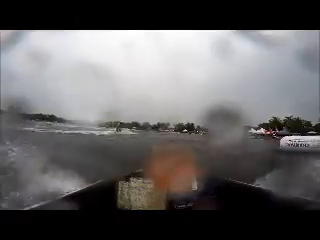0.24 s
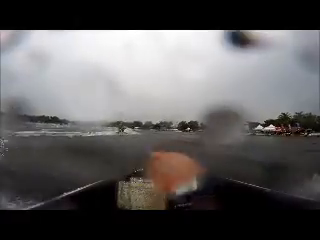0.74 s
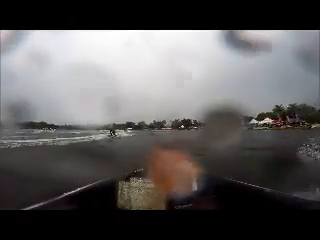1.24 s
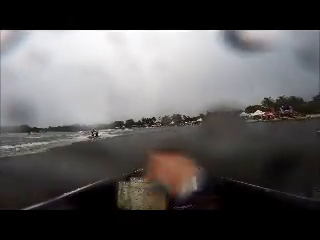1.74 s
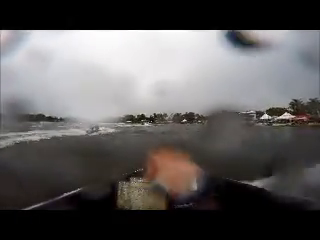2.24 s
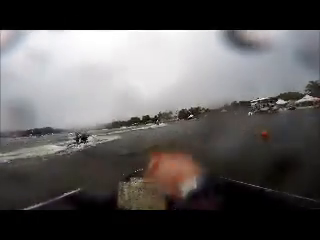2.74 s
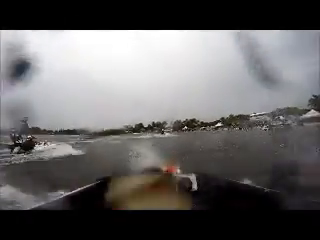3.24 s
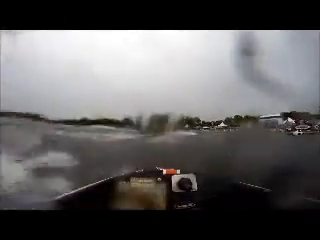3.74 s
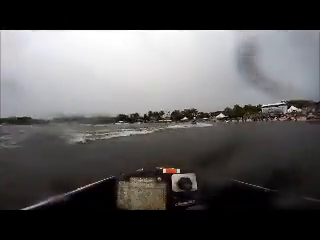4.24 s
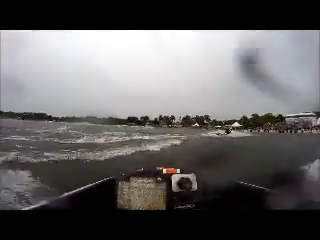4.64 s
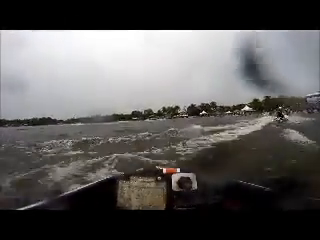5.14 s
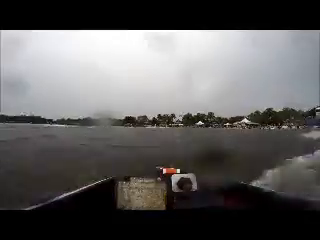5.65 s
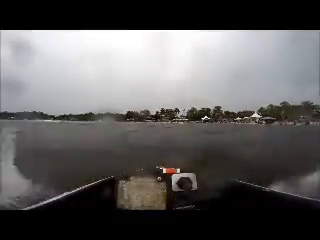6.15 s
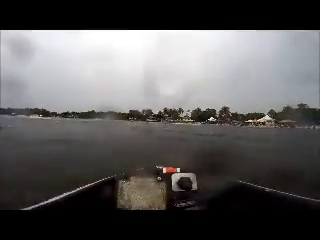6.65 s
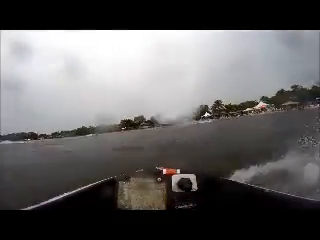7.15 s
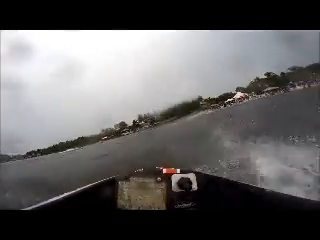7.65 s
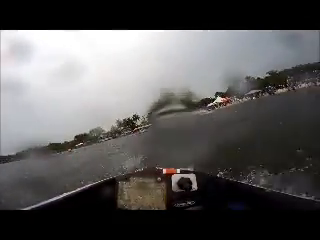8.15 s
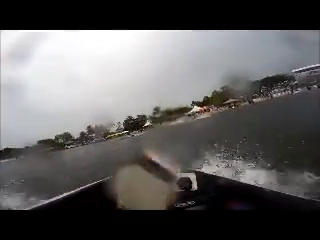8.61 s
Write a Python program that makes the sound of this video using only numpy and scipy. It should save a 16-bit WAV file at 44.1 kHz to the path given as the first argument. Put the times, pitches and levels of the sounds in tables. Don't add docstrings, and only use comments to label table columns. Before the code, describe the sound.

Muffled onboard watercraft ride: engine flaring and sagging as it leaps chop, loose plastic knocking, hard hull slaps, rushing water and ticking drops.

```python
import sys
import numpy as np
from scipy import signal
from scipy.fft import rfft, irfft, next_fast_len
from scipy.io import wavfile
from scipy.ndimage import uniform_filter1d

SR = 44100
rng = np.random.default_rng(int(sys.argv[2]) if len(sys.argv) > 2 else 0)


def wrap_up_sound(samples):
    columns = np.atleast_2d(samples).T
    tamed = np.clip(columns, -1, 1)
    steps = np.round(tamed * 32767).astype(np.int16)
    wavfile.write(sys.argv[1], SR, steps)


def nominal_scale(level):
    x = np.asarray(level, float) / 20
    return 10 ** x


N = 391608


def evened(x):
    return x / np.sqrt(np.mean(x ** 2) + 1e-20)


def steadied(x, span_s):
    size = int(span_s * SR)
    power = uniform_filter1d(uniform_filter1d(x ** 2, size), size)
    return x / np.sqrt(abs(power) + 1e-9)


def along(rows, column, t):
    rows = np.array(rows)
    return np.interp(t, rows[:, 0], rows[:, column])


def coloured(x, points):
    size = next_fast_len(N)
    f, db = np.transpose(points)
    bins = np.fft.rfftfreq(size, 1 / SR)
    gain = nominal_scale(np.interp(np.log(bins + 1), np.log(f), db))
    return irfft(rfft(x, size) * gain, size)[:N]


def band(x, low_hz, high_hz, order=2):
    return signal.sosfilt(signal.butter(order, [low_hz, high_hz], "band", fs=SR, output="sos"), x)


def ring(x, modes):
    out = 0
    for k, (hz, width, db) in enumerate(modes):
        out = out + (-1) ** k * nominal_scale(db) * signal.lfilter(*signal.iirpeak(hz, hz / width, SR), x)
    return out


def wander(span_s):
    size = int(span_s * SR)
    return evened(uniform_filter1d(uniform_filter1d(rng.standard_normal(N), size), size))


def add(mix, s, sound):
    part = mix[round(s * SR):][:len(sound)]
    part += sound[:len(part)]


def racing(t):
    # t/s, speed/turns per s
    cruise = [(0, 53), (.6, 50.5), (1.0, 55), (1.3, 46), (1.82, 66), (2.05, 68), (2.45, 70), (2.8, 60),
              (3.1, 52), (3.4, 41), (3.66, 58), (4.2, 58), (5.17, 56), (5.5, 69), (5.8, 55), (6.08, 65),
              (6.4, 47), (8.88, 45)]
    # start/s, grips again/s, top speed/turns per s, settling time/s
    revs = [(1.0, 1.15, 84, .12), (1.33, 1.61, 103, .21), (1.82, 1.95, 90, .06), (2.04, 2.17, 94, .05),
            (2.23, 2.38, 102, .07), (2.47, 2.58, 87, .2), (2.82, 2.99, 95, .11), (3.94, 4.1, 85, .08),
            (4.2, 4.33, 82, .2), (4.62, 4.97, 138, .13), (5.17, 5.39, 108, .07), (5.54, 5.66, 89, .15),
            (5.81, 5.9, 73, .16), (6.07, 6.17, 90, .13), (6.8, 6.93, 61, .3)]
    limiter_hz, rise_bend, fall_bend, swell_s = 108, .85, 1.5, 0.042
    base, gain, free = along(cruise, 1, t), 0 * t, 0 * t
    for start, grip, top, settle in revs:
        climb = np.clip((t - start) / (grip - start), 0, 1) ** rise_bend
        sag = np.clip((t - grip) / settle, 0, 1) ** fall_bend
        gain = np.maximum(gain, (climb - sag) * (top - base))
        loose = np.interp(t, [start, start + swell_s, grip, grip + settle], [0, 1, 1, 0])
        free = np.maximum(free, loose)
    return np.minimum(base + gain, limiter_hz), free


def bursts(t, exhaust_share):
    # opens/s, full/s, shuts/s, shaking level/dB, exhaust over shaking/dB
    throttle_bursts = [(0.921, 1.019, 1.107, -19, 4.5), (1.362, 1.511, 1.66, -13.5, -1),
                       (1.808, 1.894, 1.98, -25, -6.5), (1.993, 2.132, 2.16, -16.5, -3),
                       (2.215, 2.313, 2.407, -15, -5), (2.477, 2.538, 2.438, -11, -2),
                       (2.776, 2.913, 2.96, -15, -5.5), (3.878, 3.994, 3.99, -20.5, 3.5),
                       (4.19, 4.231, 4.28, -18, 2), (4.588, 4.781, 4.972, -14, 2.5),
                       (5.154, 5.262, 5.37, -19, -1), (5.54, 5.63, 5.62, -18, -3.5),
                       (5.803, 5.85, 5.79, -22, -7.5), (6.057, 6.186, 6.105, -11.5, -9)]
    open_db, release_db_per_s, lift_off_s = -16, 198, 0.013
    shake_db, opened = 0 * t - 90, 0 * t
    for start, full, shut, db, over_db in throttle_bursts:
        level = np.interp(t, [start - .03, start, full, shut, shut + 0.26],
                          [-60, open_db, 0, 0, -.3 * release_db_per_s])
        shake_db = np.maximum(shake_db, db + exhaust_share * over_db + level)
        grip = np.interp(t, [start, start + 0.026, shut, shut + lift_off_s], [0, 1, 1, 0])
        opened = np.maximum(opened, grip)
    return shake_db, opened


def ride():
    # t/s, effort level/dB, buffeting by the chop/dB
    load = [(0, -26.5, -12), (.57, -24, -8), (.9, -30, -11.5), (1.25, -37.5, -21.5), (1.8, -27, -17.5),
            (2.7, -36.5, -18.5), (3.4, -29, -10.5), (3.6, -42.5, -12), (3.9, -27, -13.5),
            (4.55, -33.5, -14), (5.1, -42.5, -17.5), (5.75, -33.5, -21), (6.05, -33, -19.5),
            (6.35, -44, -17.5), (6.75, -37, -8), (7.5, -36, -10), (8.0, -34, -12), (8.88, -32, -7)]
    # t/s, sink of the level/dB, recovery time/s, boom surge/dB
    slams = [(1.35, -7.5, 0.053, 12.5), (2.998, -10, 0.15, 7.5), (3.147, -23, 0.23, 4.5),
             (3.471, 2.5, 0.069, -9), (3.821, -5, 0.15, -2.5), (4.438, -7, 0.077, 4), (5.36, -8, 0.12, 7),
             (6.207, -14.5, 0.14, 10.5), (6.408, -11.5, 0.061, 5.5), (6.488, -0.5, 0.023, 1),
             (6.589, -11, 0.12, 3.5), (7.292, -19, 0.13, 7.5), (7.489, -2.5, .1, 3),
             (7.698, -17.5, 0.23, 7), (8.842, -12.5, .1, -4)]
    sink_s, surge_s, crash_s, exhaust_lead_s = 0.023, .03, 0.016, 0.023
    t = np.linspace(0, N / SR, num=6000)
    speed, free = racing(t)
    shake_db, opened = bursts(t, 0)
    gas_db, _ = bursts(t + exhaust_lead_s, 1)
    sink, surge, crash = 0 * t, 0 * t, 0 * t
    for s, sink_db, back, surge_db in slams:
        low = s + sink_s
        sink += np.interp(t, [s, low, low + 0.32 * back, low + back], [0, sink_db, sink_db, 0])
        surge += surge_db * np.exp(-((t - s + 0.012) / surge_s) ** 2)
        crash += surge_db * np.exp(-((t - s + .012) / crash_s) ** 2)
    load_db = along(load, 1, t)
    effort = 20 * np.log10(nominal_scale(load_db) + nominal_scale(shake_db))
    steady_gas_db = -28.5 + 0.48 * (load_db + 28.5)
    burst_gas_db = np.maximum(gas_db, shake_db - 4) - 4.0
    gas = 20 * np.log10(nominal_scale(steady_gas_db) + nominal_scale(burst_gas_db))
    drone = np.interp(speed, [40, 51.5, 79, 108], [-24, -17.5, -21, -28.5])
    drone = drone + 0.2 * (effort + 28) + 2.53 * opened
    controls = dict(speed=speed, opened=opened, sink=sink,
                    boom=along(load, 2, t) - 4.1 * free + surge + 0.76 * sink,
                    drone=drone + .9 * surge + 0.67 * sink,
                    exhaust=gas + 0.88 * sink,
                    rattle=effort + 0.8 * sink + .6 * crash)
    return {name: np.interp(np.arange(N) / SR, t, value) for name, value in controls.items()}


def water(run):
    # f/Hz, level/dB per Hz
    rush_spectrum = [(76, -33.5), (130, -1.5), (198, -16), (335, -9.5), (418, -13), (573, -15), (707, -19),
                     (807, -12), (896, -25.5), (1150, -8.5), (1380, -19.5), (2370, -16), (3000, -33),
                     (3900, -63), (6600, -120)]
    # f/Hz, level/dB per Hz
    spray_spectrum = [(2400, -6), (3000, -15.5), (3800, -3), (5000, -7), (6500, 4.5), (8000, 1.5),
                      (9200, -13.5), (11300, -9.5), (12100, -18.5), (12600, -70.5)]
    droplet_db = 2.6 * np.minimum(rng.exponential(1, N), 5)
    fine = nominal_scale(droplet_db) * (rng.random(N) < 900 / SR)
    rush = rng.standard_normal(N) * nominal_scale(2.48 * wander(0.012))
    spray = rush + .5 * evened(fine * rng.choice([-1, 1], N))
    shake_db = run["rattle"] + 28
    rush_db = 0.69 * shake_db - 31.5
    spray_db = 0.41 * run["sink"] + 0.37 * shake_db + 0.073 * run["speed"] - 45.0
    return (nominal_scale(rush_db) * evened(coloured(rush, rush_spectrum))
            + nominal_scale(spray_db) * evened(coloured(spray, spray_spectrum)))


def drops():
    # t/s, peak level/dB, level of the duller part/dB
    housing_drops = [(0.082, -30.5, 2), (0.9681, -32.5, -3), (1.5007, -46, 1), (2.2552, -20.5, 5.5),
                     (2.7691, -34.5, -8), (3.0106, -44.5, -1), (3.1313, -32, -3), (3.47, -23, -1),
                     (3.5144, -28.5, -3), (3.67, -39.5, -8), (3.8232, -35, -7), (4.1804, -29.5, -2.5),
                     (4.5103, -39.5, -1), (4.568, -38.5, -4), (4.6463, -37.5, -7), (4.9791, -26.5, -3),
                     (5.3532, -38, -9), (5.6605, -34, 14), (6.1816, -37.5, 4), (6.466, -45, -2),
                     (6.4812, -43, 16), (6.5056, -38, -3), (6.5869, -42, -3), (6.6753, -33.5, -13),
                     (6.7514, -30.5, -15), (6.8259, -46, -4), (6.9977, -29.5, 11), (7.0407, -30, -3),
                     (7.1274, -39, 3), (7.6844, -30.5, -4)]
    mist_per_s, mist_db = 5, -52
    out, t = np.zeros(N), np.arange(400) / SR
    mist = [(s * N / SR, mist_db + 13 * size, 3)
            for s, size in rng.random((int(mist_per_s * N / SR), 2))]
    rows = list(housing_drops) + mist
    splat = np.diff(rng.standard_normal((len(rows), 401)))
    for (s, db, dull_db), (tone, low), wet in zip(rows, rng.random((len(rows), 2)), splat):
        tick = np.sin(2 * np.pi * (6000 + 1200 * tone) * t) * nominal_scale(-60 * t / 0.0043)
        dull = np.sin(2 * np.pi * (2800 + 1400 * low) * t) * nominal_scale(-60 * t / 0.0016)
        tick += nominal_scale(dull_db - 10.5) * dull
        tick += 0.13 * wet * nominal_scale(-60 * t / 0.024)
        add(out, s, nominal_scale(db + 21.5) * tick)
    return out


def struck(hits, swing_hz):
    out, t = np.zeros(N), np.arange(2600) / SR
    splash = signal.lfilter(*signal.butter(N=2, Wn=[400, 3000], btype="band", fs=SR),
                            rng.standard_normal((len(hits), 2600)))
    for (s, db, hz, push_db), (lag, tone), wet in zip(hits, rng.random((len(hits), 2)), splash):
        hit = np.sin(2 * np.pi * hz * t) * nominal_scale(-60 * t / 0.027)
        hit += 0.69 * np.sin(2 * np.pi * (3430 - hz) * t) * nominal_scale(-60 * t / 0.02)
        hit += 0.21 * np.sin(2 * np.pi * (3500 + 600 * tone) * t) * nominal_scale(-60 * t / 0.0097)
        hit += .8 * wet * nominal_scale(-60 * t / .05)
        swing = np.sin(2 * np.pi * swing_hz * t) * np.exp(-t / 0.011)
        add(out, s, nominal_scale(db - 7.0) * hit)
        add(out, s + 0.0016 + 0.0071 * lag, nominal_scale(db - 21.5) * hit)
        add(out, s + 0.0022, nominal_scale(push_db - 7.0) * swing)
    return out


def panel_slaps():
    # t/s, peak level/dB, ring f/Hz, low push level/dB
    slaps = [
        (3.13, 0.5, 2150, 1),
        (3.4716, -21.5, 2640, -24),
        (5.355, -3, 2196, -12),
        (6.188, -3, 1890, -10),
        (6.242, -18, 2100, -18),
        (6.468, -17, 2310, -25),
        (6.55, -19.5, 2220, -25),
        (5.7678, -18, 1925, -4),
        (6.996, -11, 2320, -17.5),
        (7.6835, 0, 2313, 5),
    ]
    return struck(slaps, swing_hz=85)


def loose_knocks():
    # t/s, peak level/dB, ring f/Hz, low push level/dB
    loose_parts = [(1.0083, -12.5, 1130, 7), (1.3358, -16, 1244, -17), (1.5543, -9, 1070, -37),
                   (2.8523, -13, 1023, -20.5), (2.9263, -5.5, 1140, -13), (3.079, -10.5, 1130, -17),
                   (3.2617, -39, 1150, -27), (3.5861, -20, 1170, -17), (3.8055, -8, 1180, 6.5),
                   (3.9479, -16.5, 1090, 10.5), (4.462, -20, 1145, -34), (5.1614, -20.5, 1135, 0),
                   (5.4173, -12.5, 1100, -28), (5.8551, -9, 1150, 0), (5.952, -8, 1150, 0),
                   (5.9734, -2.5, 1210, 8), (6.0397, -12, 1190, -24), (6.0686, -14, 1110, -17),
                   (6.2822, -22, 1200, -22), (6.3204, -17.5, 1170, -31), (6.3512, -18, 1160, -31),
                   (6.4511, -22, 1115, -20), (6.5724, -3, 1260, 11.5), (6.756, -26.5, 1150, -2),
                   (6.8132, -13.5, 1090, 3.5), (7.4538, -8, 1200, -17), (7.5177, -20.5, 1150, -8),
                   (7.6232, -14, 1160, -20), (7.884, -17, 1150, 3), (7.9724, -17.5, 1200, -2)]
    return struck(loose_parts, swing_hz=59.4)


def firings(turns, spread_db, weak_db):
    whole = turns.astype(int)
    random_db = spread_db * rng.standard_normal(whole[-1] + 1)[whole]
    return nominal_scale(random_db + weak_db * (whole % 2))


def hull_boom(turns, strength, loaded):
    pulses = evened(strength * np.diff(np.floor(turns), prepend=0))
    thumps = evened(band(pulses, 24, 66, order=4)) * (1 - .7 * loaded)
    return thumps + .35 * evened(band(rng.standard_normal(N), 30, 58))


def shaft_drone(turns, speed, strength, loaded, opened):
    # multiple of shaft speed, level when slow/dB, level at speed/dB
    shaft_orders = [(1, 0, 0), (1.5, -9, -25), (2, -20, -11)]
    # f/Hz, width/Hz, lift/dB
    mount_hz, mount_width_hz, mount_db = (137.4, 23, 9.7)
    orders = 0
    for k, slow_db, fast_db in shaft_orders:
        lift_db = mount_db / (1 + ((k * speed - mount_hz) / mount_width_hz * 2) ** 2)
        order_db = slow_db + (fast_db - slow_db) * loaded + loaded * (0.45 + 0.88 * opened) * lift_db
        orders = orders + nominal_scale(order_db) * np.cos(2 * np.pi * k * turns + k)
    rumble = evened(band(rng.standard_normal(N), 62, 105, order=3))
    return band(orders * uniform_filter1d(strength, 500), 56, 200) + .1 * rumble


def exhaust_bark(turns, speed):
    # multiple of shaft speed, level/dB
    bark_orders = [(2, 1), (3, 0), (4, 0), (5, -10), (6, 0), (7, -8), (8, -3), (10, -6), (11, -6)]
    # f/Hz, level/dB
    pipe_hz, pipe_db = np.transpose([(150, -30.5), (215, -11.5), (320, -5.5), (420, 11), (480, 5),
                                     (560, -15), (700, -14), (900, -30), (1150, -12)])
    limited_db = 9 * np.clip((speed - 100) / 7, 0, 1)
    bark = 0
    for k, db in bark_orders:
        order_db = db + (k != 4) * limited_db + np.interp(k * speed, pipe_hz, pipe_db) + 2.0 * wander(0.033)
        bark = bark + nominal_scale(order_db) * np.cos(2 * np.pi * k * turns + k * k)
    return evened(bark)


def exhaust_note(bark, puff):
    # f/Hz, width/Hz, level/dB
    chamber = [(246, 80, 0), (310, 93, -1.5), (404, 85, -0.5), (564, 22, -13.5)]
    return 3.5 * bark + evened(ring(puff * rng.standard_normal(N), chamber))


def panel_rattle(bark, puff, turns, speed):
    # f/Hz, width/Hz, level/dB
    hull_panels = [(803, 5.7, -4.5), (1150, 32, 1.5), (1343, 87, -9.5), (1536, 55.6, -3), (1877, 200, -7.5),
                   (2520, 338, -12.5)]
    chatter = nominal_scale(1.62 * wander(0.0023))
    lope = nominal_scale(-8 * np.clip((50 - speed) / 4, 0, 1) * (turns % 2 > 1))
    shaking = evened(puff * lope * chatter * rng.standard_normal(N))
    rattle = ring(0.12 * bark + shaking, hull_panels)
    beads = evened(ring(puff * lope ** 2 * rng.standard_normal(N), hull_panels[:2]))
    return rattle, beads


def engine(run):
    speed = uniform_filter1d(run["speed"], 1000)
    turns = np.cumsum(speed * (1 + .012 * wander(.03))) / SR
    loaded = np.clip((speed - 54) / 14, 0, 1)
    strength = firings(turns, spread_db=2.0, weak_db=-4.0) ** (1 - .8 * loaded)
    puff = strength * (1.2 + np.exp(-(turns % 1) / 0.15))
    loud = np.clip((run["exhaust"] + 34) / 12, 0, 1)
    throttle = loaded * loud * (.15 + .85 * run["opened"]) + .16 * np.clip((speed - 47) / 4, 0, 1)
    bark = throttle * exhaust_bark(turns, speed)
    boom = hull_boom(turns, strength, loaded)
    drone = shaft_drone(turns, speed, strength, loaded, run["opened"])
    exhaust = exhaust_note(bark, puff)
    rattle, beads = panel_rattle(bark, puff, turns, speed)
    return (nominal_scale(run["rattle"] - 8.0 - 17.0 * loaded) * beads
            + nominal_scale(run["boom"] + 2 * wander(.025)) * steadied(boom, 0.089)
            + nominal_scale(run["drone"] + 2 * wander(.04)) * steadied(drone, 0.041)
            + nominal_scale(run["exhaust"] - 1.5) * steadied(exhaust, 0.041)
            + nominal_scale(run["rattle"] - 5.5) * steadied(rattle, 0.9))


def scene():
    run = ride()
    return (water(run) + drops() + panel_slaps() + loose_knocks() + engine(run))[None]


def thin_treble(x):
    hz, _, z = signal.stft(x, SR, nperseg=2048)
    strip = (hz // 450).astype(int)
    starts = np.unique(strip, return_index=True)[1]
    strip_db = 10 * np.log10(np.add.reduceat(abs(z) ** 2, starts) + 1e-20)
    jitter_db = 6 * uniform_filter1d(rng.standard_normal(strip_db.shape), 3, axis=1)
    swell_db = .5 * (strip_db[16] - strip_db[16].mean())
    strip_db = (strip_db + jitter_db - swell_db)[strip]
    kept = (hz[:, None] < 8400) | (strip_db > -84)
    return signal.istft(z * kept, SR, nperseg=2048)[1][None, :N]


def band_limit(x):
    return signal.sosfilt(signal.butter(12, 12100, fs=SR, output="sos"), x)


def record(dry):
    dull = signal.lfilter(*signal.butter(N=2, Wn=3200, fs=SR), dry) + 0.16 * dry
    dull = signal.lfilter(*signal.butter(N=2, Wn=26, btype="high", fs=SR), dull)
    limited = 1.038 * np.tanh(thin_treble(dull[0]) / 1.206)
    return band_limit(limited)


dry = scene()
out = record(dry)
wrap_up_sound(out)
```